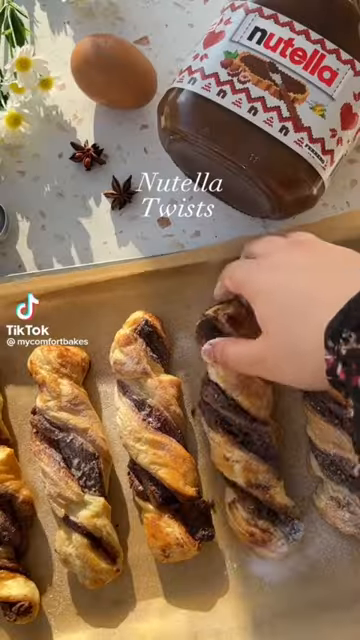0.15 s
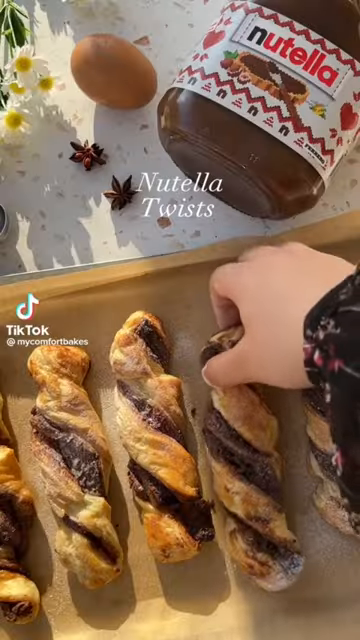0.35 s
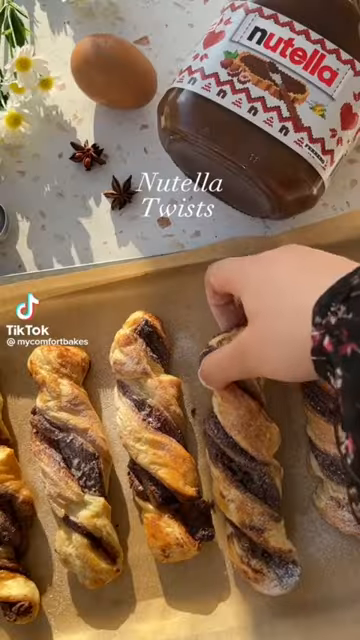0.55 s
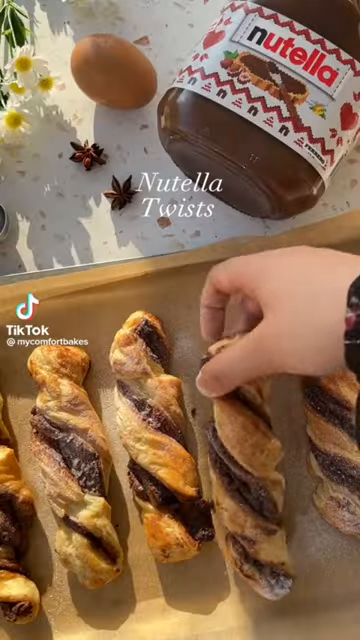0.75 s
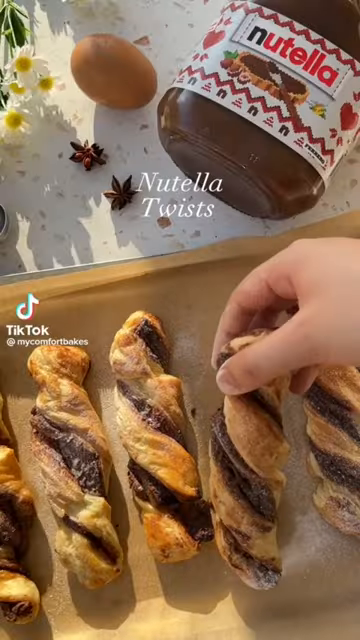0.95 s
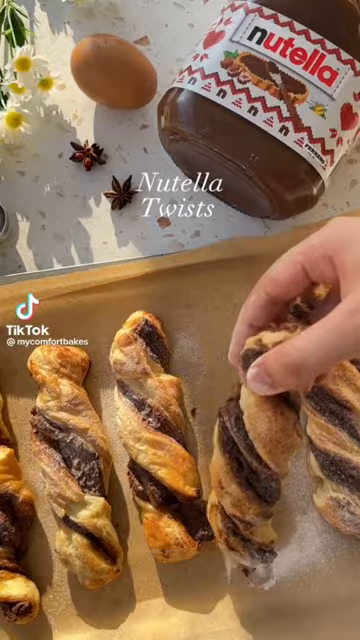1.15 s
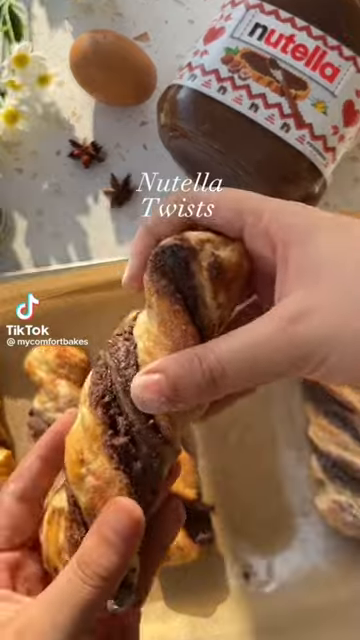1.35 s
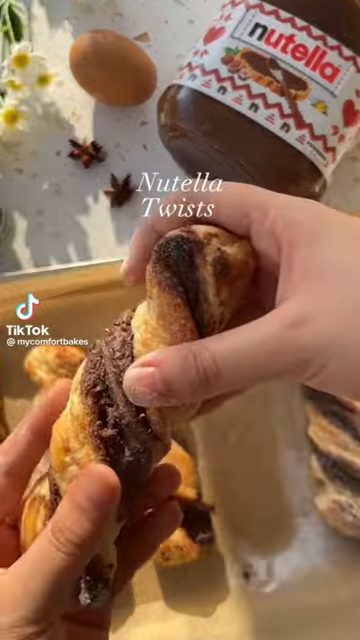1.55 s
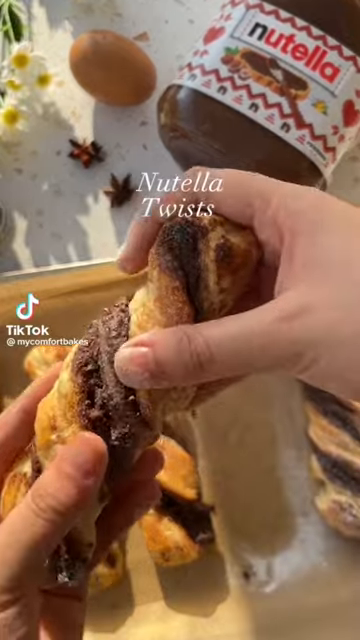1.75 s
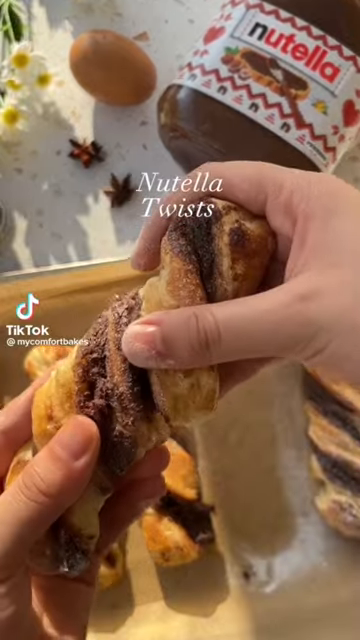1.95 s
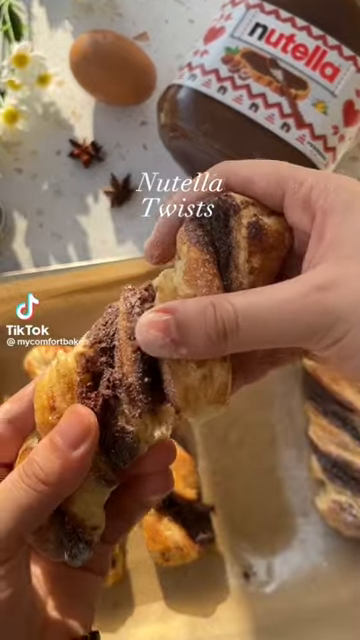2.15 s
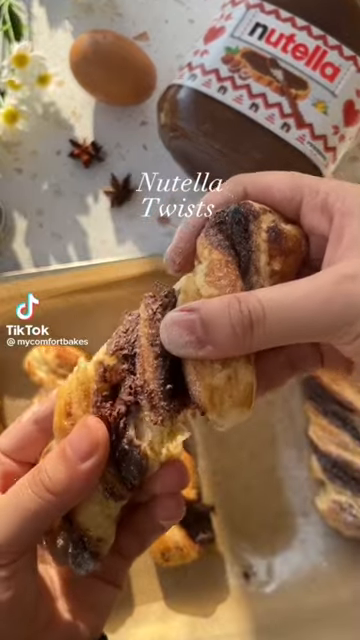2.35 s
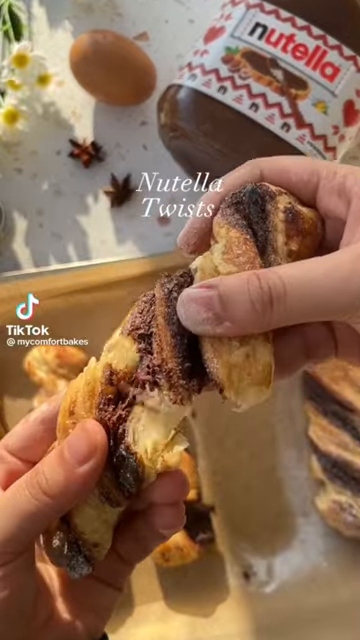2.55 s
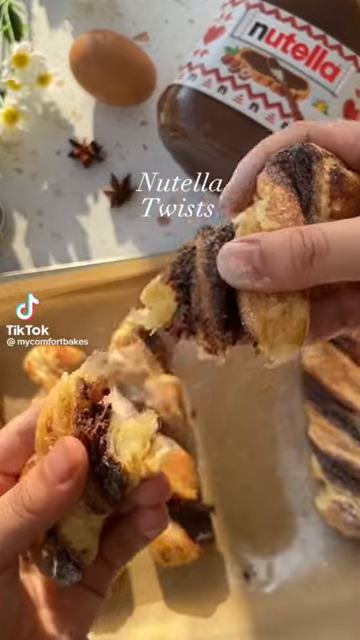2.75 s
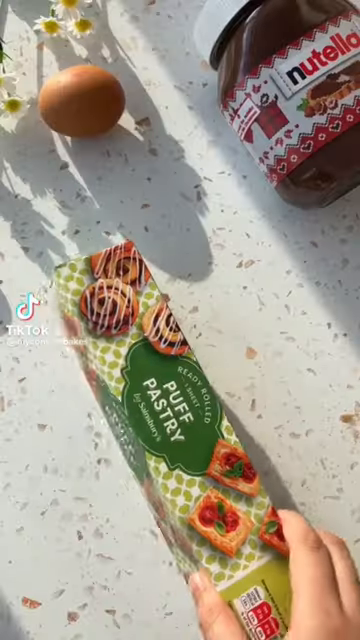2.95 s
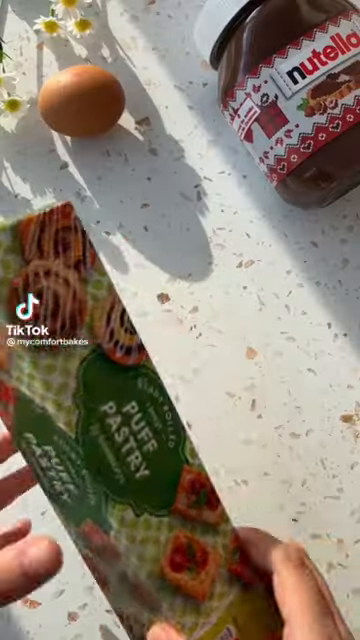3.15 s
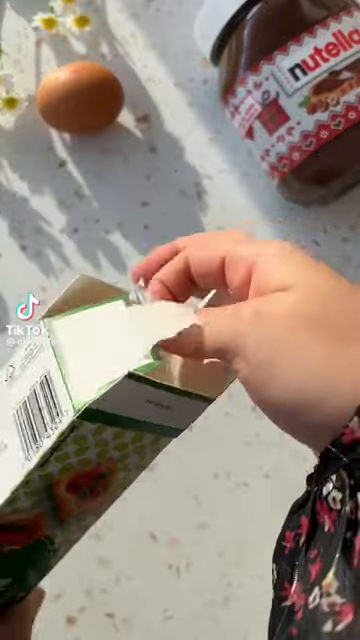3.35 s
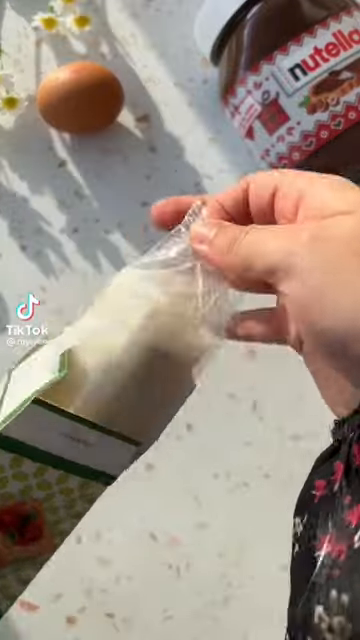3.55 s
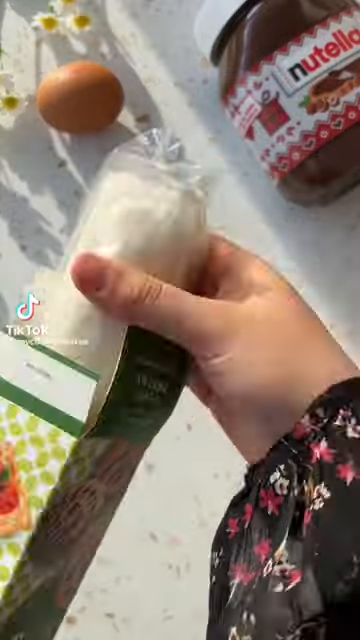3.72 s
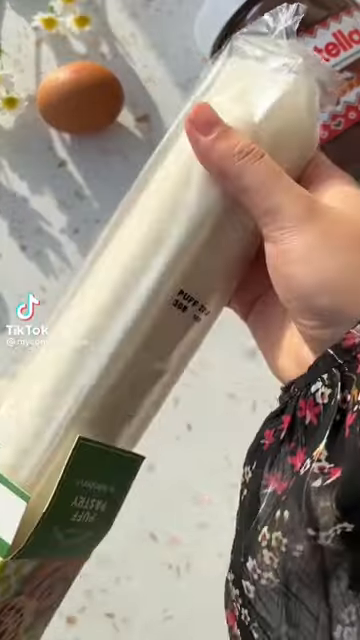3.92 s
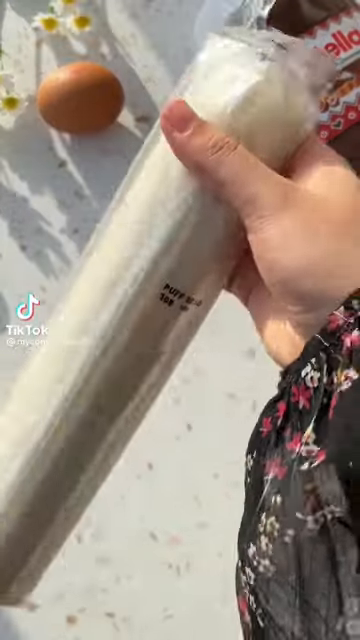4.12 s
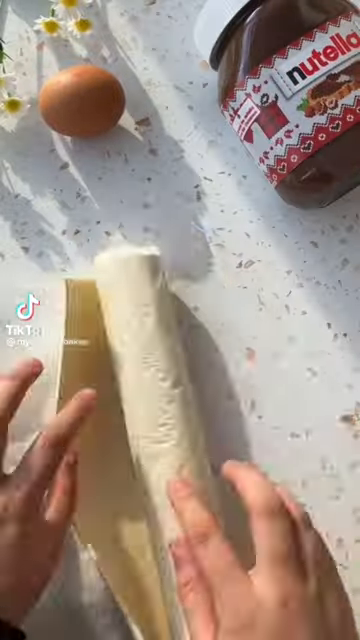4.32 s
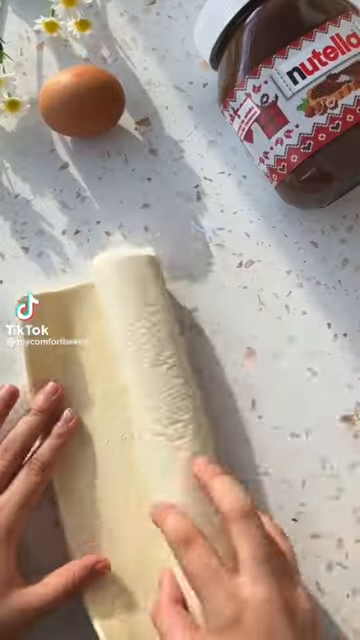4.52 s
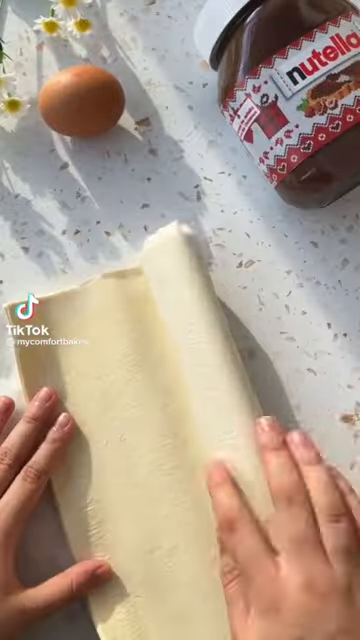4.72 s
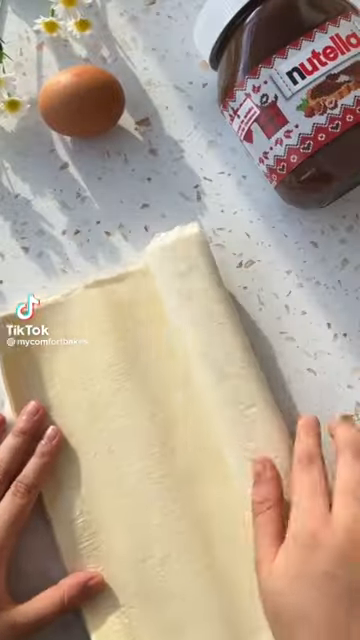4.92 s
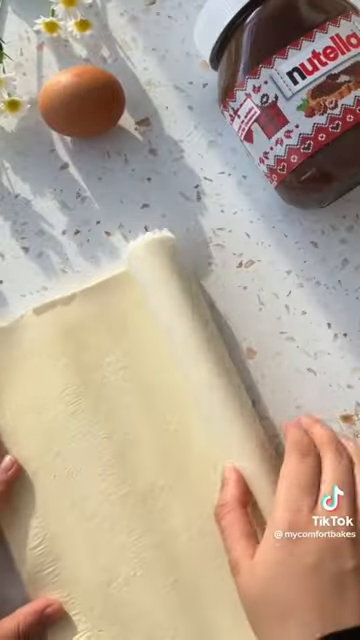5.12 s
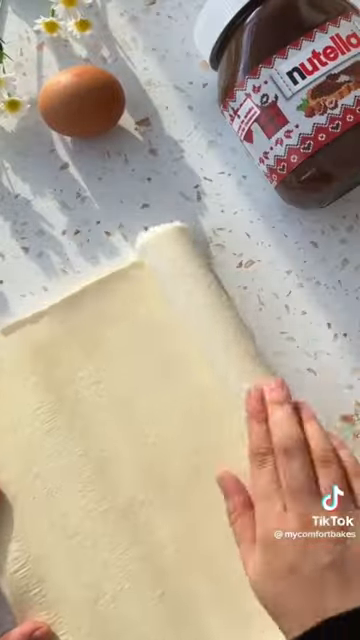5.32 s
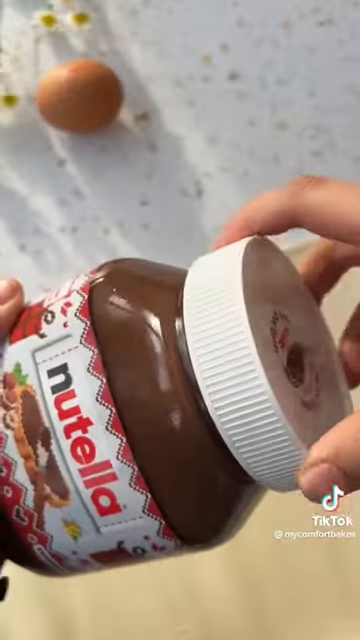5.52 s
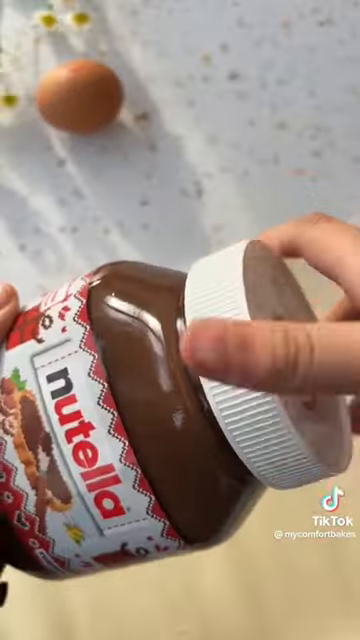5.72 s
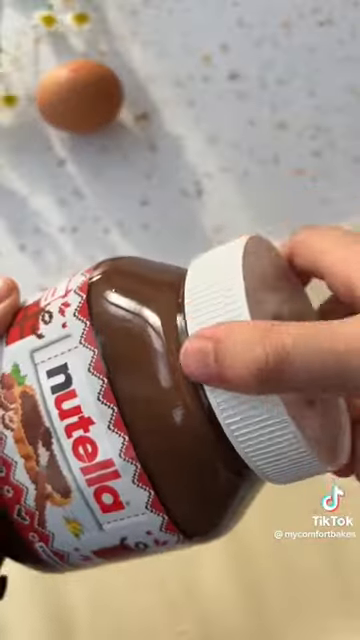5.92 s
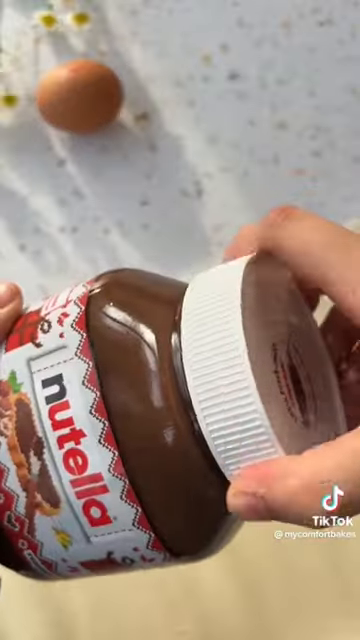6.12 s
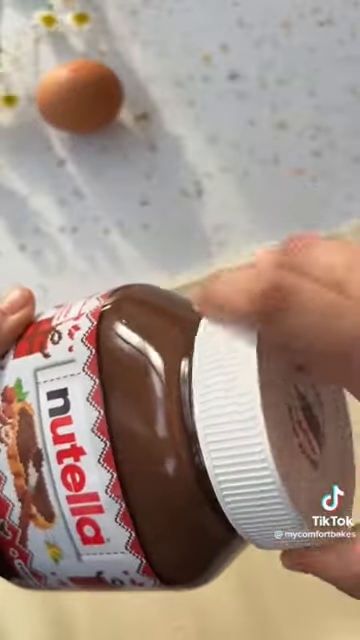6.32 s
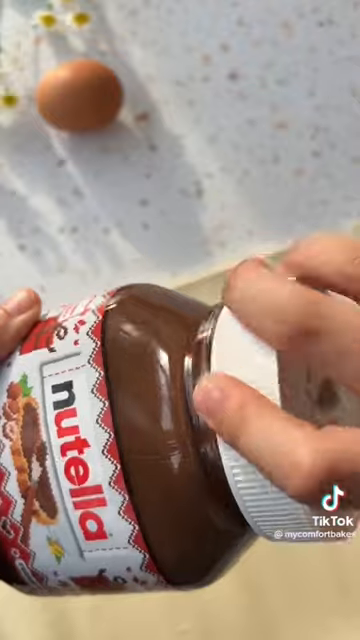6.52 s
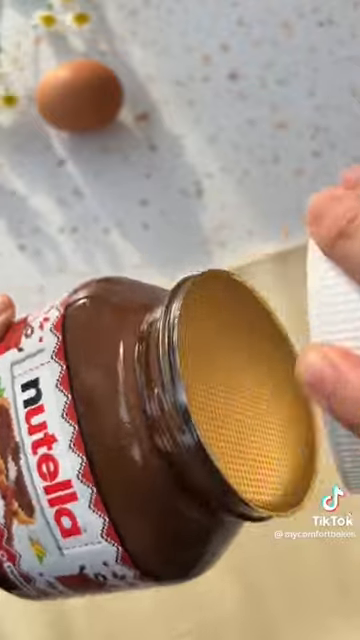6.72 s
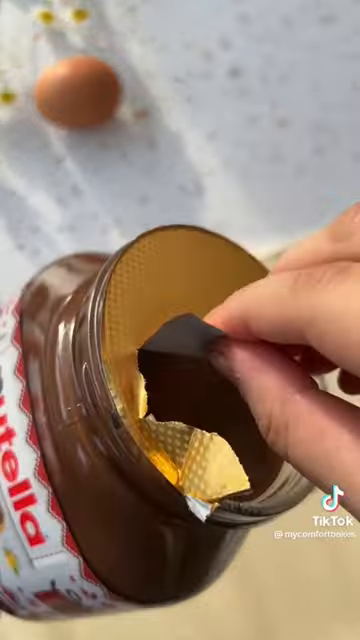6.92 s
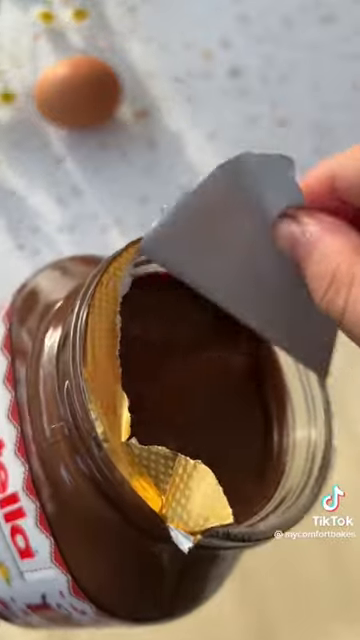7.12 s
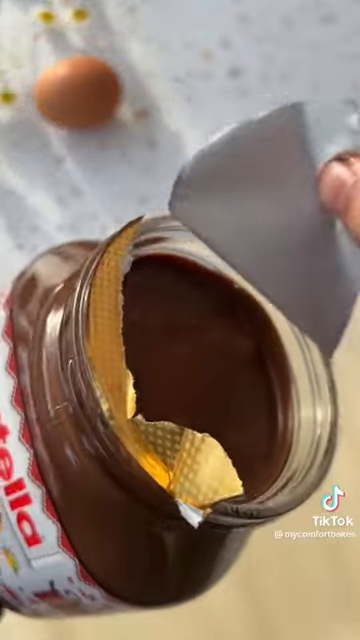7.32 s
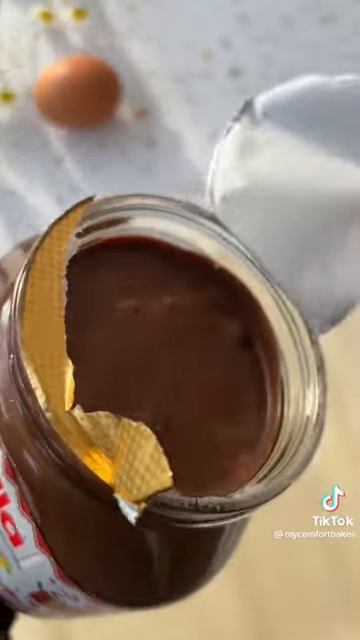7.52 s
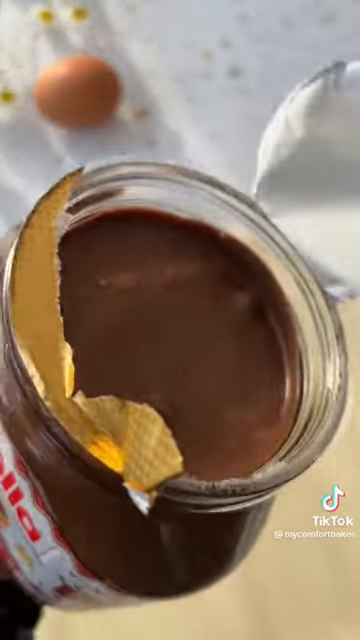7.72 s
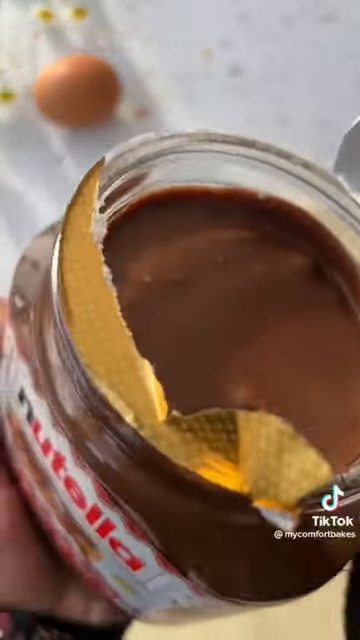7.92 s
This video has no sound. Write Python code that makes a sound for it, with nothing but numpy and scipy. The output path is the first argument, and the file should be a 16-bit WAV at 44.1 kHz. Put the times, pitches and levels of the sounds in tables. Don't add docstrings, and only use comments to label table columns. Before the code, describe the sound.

Intimate stereo phone pickup with little room echo and a quiet low hum. First come crisp flake cracks and a dry tear, then card rubbing, a dull box knock and sharp wrapper crackles, followed by soft rustling as a sheet unrolls. Lid threads tick faster and pop free with a hollow knock. Loudest of all, glued foil tears in a metallic rip, clicking and fluttering before faint touches on glass.

```python
import sys
import numpy as np
from scipy import signal
from scipy.fft import rfft, irfft, next_fast_len
from scipy.io import wavfile
from scipy.ndimage import uniform_filter1d

SR = 44100
rng = np.random.default_rng(int(sys.argv[2]) if len(sys.argv) > 2 else 0)


def natural_amplitude(level_db):
    exponent = np.asarray(level_db, float) / 20
    return 10 ** exponent


def output_pcm(signal):
    pcm = np.clip(np.atleast_2d(signal).T, -1, 1) * 32767
    wavfile.write(sys.argv[1], SR, np.round(pcm).astype(np.int16))


N = 355887


def evened(x):
    return x / np.sqrt(np.mean(x ** 2) + 1e-20)


def read(points, hz):
    f, value = np.transpose(points)
    return np.interp(np.log(hz + 1), np.log(f + 1), value)


def columns(rows):
    s, *cols = np.transpose(rows)
    t = np.arange(s[0], s[-1], 1 / SR)
    return s[0], [np.interp(t, s, c) for c in cols]


def add(mix, s, sound):
    part = mix[round(s * SR):][:len(sound)]
    part += sound[:len(part)]


def resonate(x, hz, width):
    turn = np.exp(2j * np.pi * np.cumsum(hz * np.ones(len(x))) / SR)
    r = np.exp(-np.pi * width / SR)
    return 2 * (turn * signal.lfilter([1 - r], [1, -r], x / turn)).real


def strokes(rows, start, end):
    stroke_db = 20
    t = np.arange(start, end, 1 / SR)
    peaks = [start] + [row[0] for row in rows] + [end]
    gains = []
    for (s, db, rise, fall), before, after in zip(rows, peaks, peaks[2:]):
        slope = np.maximum((s - t) / rise, (t - s) / fall)
        gains.append(natural_amplitude(db - stroke_db * slope) * (t > before) * (t < after))
    return gains


HELD = {"pastry": (.11, 2.9, -14, -81, -80), "box": (2.9, 4.33, 0, -76, -78),
        "sheet": (4.33, 5.93, -11, -81, -88), "lid": (5.42, 6.9, -8, -85, -95),
        "foil": (6.915, 7.74, -10, -72, -60), "jar": (7.74, 8.07, -8, -75, -77)}


def effort(rows, held):
    start, end, heft_db, idle_body_db, idle_crisp_db = HELD[held]
    power = np.array(strokes([row[:4] for row in rows], start, end)) ** 2
    heft = natural_amplitude(np.array([heft_db + sum(row[4:]) for row in rows])) ** 2
    body = np.sqrt(heft @ power + natural_amplitude(idle_body_db) ** 2)
    crisp = np.sqrt(power.sum(0) + natural_amplitude(idle_crisp_db) ** 2)
    return start, body, crisp


def flicker(n, per_s, spread_db, ring_s):
    happens = rng.random(n) < per_s / SR
    power = natural_amplitude(spread_db * np.minimum(rng.exponential(1, n), 4)) ** 2 * happens
    power = signal.lfilter([1], [1, -np.exp(-1 / (ring_s * SR))], power)
    power = signal.lfilter([1], [1, -np.exp(-1.6 / (ring_s * SR))], power[::-1])[::-1]
    return power / (uniform_filter1d(power, 3000) + 1e-9)


TONE_HZ = [300, 700, 1100, 2300, 4300, 5000, 6000, 10500, 13000, 15300]


def crinkle(rows, held, tone, per_s, spread_db, smooth, ring_s=0.0014, patch_s=0.0024):
    s, body, crisp = effort(rows, held)
    n = len(body)
    size = next_fast_len(n)
    hz = np.fft.rfftfreq(size, 1 / SR)
    colour = natural_amplitude(read([(150, -48.5)] + list(zip(TONE_HZ, tone)) + [(16000, -38)], hz))
    noise = rfft(rng.standard_normal(n), size) * colour
    wide = flicker(n, per_s, spread_db, ring_s)
    centres = np.geomspace(500, 13000, num=11)
    dull, bright = np.zeros((2, n))
    for k, f in enumerate(centres):
        patch = np.sqrt(np.interp(np.log(hz + 1), np.log(centres), np.arange(len(centres)) == k))
        bursts = 1.02 * wide + .4 * flicker(n, per_s / 3, spread_db, patch_s)
        power = smooth + (1 - smooth) * bursts
        layer = bright if f > 1700 else dull
        layer += irfft(noise * patch, size)[:n] * np.sqrt(power)
    return s, body * evened(dull) + crisp * evened(bright)


# peak in seconds, effort in dB, rise in seconds, fall in seconds,
# and extra heft in dB where the grip is unusual.
PASTRY = [(.137, -53.5, .015, .4, -10), (.303, -38.5, .18, .13), (.483, -46.5, .02, .2, -8),
          (.676, -55.5, .08, .2, 7), (.825, -42.5, .03, .12), (.918, -45.5, .15, .1),
          (1.01, -50, .07, .1, 8), (1.1, -55, .025, .08, 9), (1.3, -64.5, .03, .5, 13),
          (1.612, -60.5, .03, .15), (1.672, -47.5, .035, .6), (1.878, -42, .1, .2), (1.938, -37, .2, .12),
          (2.05, -54, .1, .2), (2.39, -66, .3, .3), (2.56, -56, .15, .11, -10)]
PASTRY_TONE = [-3, -10, -4, -4, -3, -2, -4, -3, -9, -5]


def pastry():
    return crinkle(PASTRY, "pastry", PASTRY_TONE, 500, 2.8, 0.24)


# peak in seconds, effort in dB, rise in seconds, fall in seconds, extra heft in dB.
BOX = [(2.935, -55, .05, .14, 0), (3.3, -63, .01, .2, 4), (3.43, -50, .05, .7, -2),
       (3.757, -39, .027, .008, -16), (3.865, -51.5, .06, .9, 0), (4.19, -44, .03, .07, -9),
       (4.285, -46.5, .04, .05, -15)]
BOX_TONE = [-8.5, -7.5, -6, -4, -9.5, -9.5, -10.5, -10.5, -17.5, -19]


def box():
    return crinkle(BOX, "box", BOX_TONE, 570, 4.6, 0.7)


# peak in seconds, effort in dB, rise in seconds, fall in seconds,
# and sometimes extra heft in dB.
SHEET = [(4.345, -55, .02, .22),(4.532, -55, .2, .4), (4.635, -52, .3, .19), (4.8, -61, .08, .8),
         (4.915, -56, .04, .6), (5.06, -48, .3, .2, 5), (5.28, -54, .3, .2), (5.395, -51, .15, .05),
         (5.613, -64.5, .3, .05)]
SHEET_TONE = [2, -3, 0., -2, -2, -.5, -3, -1, -6, -15]


def sheet():
    return crinkle(SHEET, "sheet", SHEET_TONE, 400, 2.8, 0.3)


# peak in seconds, effort in dB, rise in seconds, fall in seconds, extra heft in dB.
LID = [(5.45, -62, .03, .14, 10), (5.985, -49, .04, .35, 0), (6.128, -45, .15, .6, -2),
       (6.345, -39, .6, .04, -6), (6.388, -39, .04, .3, -6), (6.441, -35, .2, .08, -3),
       (6.522, -30, .022, .15, 0), (6.557, -23.5, .07, .1, -1), (6.585, -24.5, .05, .045, -2),
       (6.655, -41, .2, .125, 0)]
LID_TONE = [-6, 1, 0., -13, -10, -6.5, -10.5, -8.5, -31, -14]


def lid():
    return crinkle(LID, "lid", LID_TONE, 300, 2.2, 0.17, ring_s=.003)


# peak in seconds, effort in dB, rise in seconds, fall in seconds, extra heft in dB.
FOIL = [(6.948, -28.5, .009, .6, -3), (7.04, -24, .4, .25, -3), (7.16, -34, .5, .05, -2),
        (7.2, -38.5, .1, .065, -6), (7.44, -33.5, .3, .07, 4), (7.519, -38.5, .1, .15, 3),
        (7.663, -42.5, .5, .06, 0)]
FOIL_TONE = [0., 2, 4, -4.5, -6, -5, -8, -3, -19, .5]


def foil():
    return crinkle(FOIL, "foil", FOIL_TONE, 300, 3.5, 0.75, ring_s=0.0023, patch_s=0.0036)


# peak in seconds, effort in dB, rise in seconds, fall in seconds.
JAR = [(7.785, -50, .04, .1), (7.826, -48, .05, .1), (8.012, -46, .022, .07)]
JAR_TONE = [10.5, 0., -3.5, -4, -6.5, -5, -7, 2.5, -15, -27]


def jar():
    return crinkle(JAR, "jar", JAR_TONE, 400, 5.7, 0.13)


def snaps(rows, wide_db, octaves, t60, spike_db, trim_db):
    rise_s = .008
    out = np.zeros(N)
    t = (np.arange(2048) - 256) / SR
    hz = np.fft.rfftfreq(2048, 1 / SR)
    noise = rfft(rng.standard_normal((len(rows), 2048)))
    wide = natural_amplitude(read([(200, -14), (1500, -3), (10500, -1.5), (12000, -6), (15300, -11.5), (16000, -56.5)], hz))
    for (s, db, f), z in zip(rows, noise):
        colour = np.exp(-(np.log2((hz + 1) / f) / octaves) ** 2) + natural_amplitude(wide_db) * wide
        fade = natural_amplitude(-60 * np.maximum(t / (t60 * (3000 / f) ** .3), -t / rise_s))
        spike = np.roll(irfft(colour), 256)
        snap = evened(irfft(z * colour)) * fade + natural_amplitude(spike_db) * spike / spike.max()
        peak = np.sqrt(uniform_filter1d(snap ** 2, size=40).max())
        add(out, s + t[0], natural_amplitude(db + trim_db) * snap / peak)
    return out


# time in seconds, peak in dB, centre in Hz.
FLAKES = [(0.2182, -27, 3100), (0.3038, -26, 3270), (0.3736, -40, 3270), (0.3852, -43, 7320),
          (0.4241, -39, 6290), (0.5247, -39, 6800), (0.6425, -38, 1980), (0.6733, -38, 1550),
          (0.6791, -32, 6290), (0.701, -42, 2070), (0.7633, -43, 6200), (0.7766, -30, 5860),
          (0.8001, -30, 6030), (0.8739, -37, 9040), (0.9188, -29, 2070), (0.9969, -37, 3100),
          (1.0975, -36, 2930), (1.2684, -63, 1120), (1.604, -56, 10590), (1.612, -47, 6200),
          (1.6237, -49, 10590), (1.6651, -39, 1640), (1.6709, -33, 6120), (1.6993, -35, 5770),
          (1.7163, -39, 1380), (1.7279, -37, 7320), (1.7362, -40, 5770), (1.7743, -38, 7580),
          (1.8044, -40, 8960), (1.8458, -24, 8010), (1.8764, -26, 6890), (1.8841, -30, 7490),
          (1.8923, -31, 10850), (1.9383, -28, 6630), (1.9642, -32, 6120), (1.99, -34, 4050),
          (2.0053, -37, 2330), (2.0496, -42, 4480), (2.0546, -41, 10340), (2.0936, -47, 3530),
          (2.1113, -38, 2930), (2.1341, -50, 10250), (2.1445, -51, 2410), (2.1681, -53, 4050),
          (2.2754, -54, 2930), (2.295, -45, 9910), (2.3202, -56, 5860), (2.3899, -47, 4310),
          (2.4751, -51, 9220), (2.8231, -50, 4130)]
# time in seconds, peak in dB, centre in Hz.
CREASES = [(2.9051, -58, 1120), (2.9309, -44, 2580), (2.9977, -51, 1810), (3.2208, -56, 1290),
           (3.2317, -49, 1290), (3.2481, -60, 1640), (3.2647, -57, 1120), (3.2905, -57, 1380),
           (3.2983, -37, 1290), (3.3578, -36, 1120), (3.3628, -42, 1120), (3.398, -40, 3360),
           (3.4353, -39, 2070), (3.4966, -42, 1460), (3.5866, -38, 1120), (3.6816, -24, 2760),
           (3.6937, -37, 5680), (3.7268, -46, 3530), (3.74, -23, 2760), (3.7556, -25, 3100),
           (3.7613, -26, 2150), (3.7822, -52, 2070), (3.8174, -48, 2240), (3.8349, -47, 1290),
           (3.8908, -39, 1460), (3.9138, -41, 2150), (3.9189, -41, 1720), (3.9416, -42, 1120),
           (3.9553, -43, 1640), (4.057, -34, 7920), (4.0719, -41, 3530), (4.1188, -22, 6370),
           (4.1244, -34, 2670), (4.1645, -44, 1980), (4.1826, -31, 1460), (4.1895, -32, 1980),
           (4.2105, -36, 1290), (4.2178, -29, 6800), (4.2751, -32, 6720), (4.2824, -30, 5600),
           (4.2948, -40, 6800), (4.3199, -47, 2670), (4.4692, -45, 1810), (4.601, -35, 3450),
           (4.6789, -42, 4310), (4.8312, -42, 3530), (4.9112, -45, 2240), (5.1699, -39, 5170),
           (5.1847, -38, 6890), (5.5105, -48, 1210), (5.588, -44, 1290), (5.6079, -49, 1640),
           (5.6146, -45, 1810), (5.6278, -53, 1720), (5.8765, -53, 7060), (5.9254, -51, 1720)]


def flakes_and_creases():
    return snaps(FLAKES + CREASES, -4.0, 0.4, 0.018, 12.0, -3.0)


# time in seconds, peak in dB, centre in Hz.
THREAD = [(5.9714, -35, 1810), (5.9782, -27, 1720), (5.9983, -32, 2760), (6.0031, -28, 1640),
          (6.0164, -33, 2760), (6.036, -30, 8700), (6.0436, -32, 1810), (6.0755, -28, 7580),
          (6.0804, -35, 7240), (6.1014, -29, 7670), (6.1194, -30, 8180), (6.1249, -23, 7580),
          (6.1321, -24, 5940), (6.1419, -28, 1720), (6.1778, -27, 1720), (6.2124, -27, 6460),
          (6.2362, -18, 6290), (6.2418, -27, 7240), (6.2501, -25, 7410), (6.2726, -27, 6290),
          (6.2832, -18, 5770), (6.2952, -25, 5680), (6.2999, -27, 5600), (6.3337, -22, 6120),
          (6.34, -20, 5940), (6.3504, -29, 1640), (6.4325, -22, 1720), (6.4467, -20, 6980),
          (6.4656, -24, 7150), (6.4808, -29, 7750), (6.4898, -17, 6980), (6.4987, -27, 6720),
          (6.5177, -15, 7490), (6.5286, -11, 7320), (6.5499, -9, 5770), (6.5598, -5, 6980),
          (6.5837, -7, 1380), (6.6481, -19, 8270), (6.6556, -16, 8440)]


def thread_slips():
    return snaps(THREAD, -4.0, 0.35, 0.012, 13.0, -7.0)


# time in seconds, peak in dB, centre in Hz.
TICKS = [(6.9468, -18, 3700), (6.9653, -13, 3700), (7.0105, -13, 1980), (7.0367, -11, 2410),
         (7.0443, -7, 1890), (7.053, -13, 1890), (7.0628, -14, 1810), (7.0893, -14, 1640),
         (7.1004, -14, 5600), (7.2072, -26, 1120), (7.3155, -29, 6980), (7.3874, -22, 1210),
         (7.4198, -21, 3790), (7.4426, -20, 1120), (7.4485, -21, 1290), (7.5141, -22, 1550),
         (7.5233, -20, 1720), (7.5371, -24, 1460), (7.5518, -29, 7840), (7.5666, -31, 8180),
         (7.5808, -30, 2500), (7.5864, -27, 2670), (7.6009, -29, 1120), (7.6152, -22, 9300),
         (7.6337, -27, 3100), (7.646, -30, 7580), (7.6575, -23, 1550), (7.6643, -21, 7670),
         (7.6774, -26, 7670), (7.6893, -36, 9990), (7.6999, -35, 10080), (7.7108, -33, 9910),
         (7.724, -34, 10160), (7.7928, -37, 9220), (7.8242, -30, 9040), (7.8911, -44, 7920),
         (7.9147, -44, 7060), (8.0086, -35, 8610), (8.047, -43, 5860)]


def foil_ticks():
    return snaps(TICKS, -2.0, 0.3, 0.012, 12.0, -9.0)


def ringing(x, start, end, modes, wander, swell_db):
    part = x[round(start * SR):round(end * SR)]
    steps = rng.standard_normal((2, len(modes), len(part) // 256 + 1))
    drift = np.repeat(uniform_filter1d(steps, size=4), 256, 2)
    drift = evened(uniform_filter1d(drift, 256))[..., :len(part)]
    total = np.zeros(len(part))
    for (hz, width, db), pitch, swell in zip(modes, *drift):
        total += natural_amplitude(db + swell_db * swell) * resonate(part, hz * (1 + wander * pitch), width)
    return start, total


# pitch in Hz, width in Hz, level in dB.
LID_MODES = [(615, 60, 14.5), (800, 150, 3), (1000, 120, 1), (1880, 110, 9), (2830, 120, 5), (3200, 150, 4),
             (4240, 200, 3), (4870, 80, 5), (5820, 250, 1), (7400, 500, -1)]


def lid_ring(x):
    return ringing(x, 5.42, 6.9, LID_MODES, .012, 1.2)


# pitch in Hz, width in Hz, level in dB.
FOIL_MODES = [(900, 90, 4), (1200, 80, 4), (1500, 80, 5), (2260, 120, 7), (2700, 120, 3), (5600, 160, 3),
              (7500, 200, 3)]


def foil_ring(x):
    return ringing(x, 6.915, 7.74, FOIL_MODES, .05, 4.2)


# pitch in Hz, width in Hz, level in dB.
RIM = [(3650, 160, 5)]


def rim_ring(x):
    return ringing(x, 6.915, 7.74, RIM, .02, 5.0)


# time in seconds, pitch in Hz, level in dB.
PULLS = [
    [(6.94, 1150, 1), (7.0, 1600, 0), (7.045, 2050, 2), (7.16, 2500, -1)],
    [(7.26, 1500, 2), (7.33, 2000, 5), (7.39, 2800, 6), (7.43, 3600, 5), (7.47, 3000, -6)],
]


def foil_pulls(x):
    out = np.zeros(N)
    width = 500
    for rows in PULLS:
        s, (hz, db) = columns(rows)
        part = x[round(s * SR):][:len(hz)]
        add(out, s, natural_amplitude(db) * resonate(resonate(part, hz, width), hz, width))
    return out


# peak in seconds, level in dB, pitch in Hz.
MOUTH = [(6.975, -35, 345), (7.0, -37, 360), (7.098, -25, 670), (7.135, -26, 530), (7.2, -26, 506),
         (7.343, -32, 640), (7.443, -33, 625), (7.513, -34, 463), (7.62, -35, 530)]
# time in seconds, pitch in Hz, level in dB.
FLAP = [(7.32, 284.5, -51.5), (7.448, 157, -52.5), (7.56, 181.7, -75)]


def jar_air():
    gulp_rise_s, gulp_fall_s = .04, .06
    out = np.zeros(N)
    s, end = HELD["foil"][:2]
    level = sum(strokes([(at, db, gulp_rise_s, gulp_fall_s) for at, db, _ in MOUTH], s, end))
    hz = np.interp(s + np.arange(len(level)) / SR, *np.transpose(MOUTH)[::2])
    drive = rng.standard_normal(len(hz)) * np.sqrt(0.19 + flicker(len(hz), 120, 3.0, 0.0073))
    air = resonate(resonate(drive, hz, 87), hz, 240)
    add(out, s, level * air / np.sqrt(uniform_filter1d(air ** 2, size=1200)))
    s, (hz, db) = columns(FLAP)
    hum = np.sin(2 * np.pi * np.cumsum(hz) / SR)
    add(out, s, natural_amplitude(db + 7.5) * hum * signal.windows.tukey(len(db), .2))
    return out


# time in seconds, peak in dB, pitch in
# Hz, time to fade by 60 dB in seconds, length in seconds.
KNOCKS = [(0.852, -37.5, 420, 0.024, .05), (1.011, -39, 240, .12, .04), (1.058, -42, 190, .15, .04),
          (3.3575, -27, 887, 0.03, .008), (3.3618, -30.5, 135, 0.87, 0.015),
          (3.3766, -30.5, 170, 0.87, 0.0095), (4.109, -32.5, 744, 0.022, .02), (4.119, -36, 450, .03, .02),
          (4.28, -35, 300, 0.05, 0.02), (.875, -42, 500, .04, .03), (6.556, -23.5, 180, 0.067, 0.19),
          (6.56, -22, 383, 0.046, .1), (6.581, -26, 370, .08, .1), (6.568, -15, 1740, .05, .03),
          (6.582, -17, 1500, .04, .03), (7.14, -21, 920, .1, .03), (3.364, -38, 430, .1, .02),
          (7.004, -16, 2300, .04, .02), (7.103, -13, 5430, .03, .012), (7.66, -33, 153.5, 0.061, .1),
          (7.825, -38.5, 523, 0.056, .05)]


def knocks():
    out = np.zeros(N)
    for s, db, hz, t60, length in KNOCKS:
        t = np.arange(0, length, 1 / SR)
        stop = np.minimum((length - t) / .001, 1)
        add(out, s, natural_amplitude(db - 60 * t / t60) * np.sin(2 * np.pi * hz * t) * stop)
    return out


# pitch in Hz, time to fade by 60 dB in seconds.
KITCHEN = [(200, 0.79), (2000, 0.3), (10000, 0.39)]


def kitchen(x):
    taps = np.zeros(SR // 2)
    at = np.arange(200, SR // 2 - 20, 20)
    taps[at + rng.integers(0, 20, len(at))] = rng.choice([-1., 1.], len(at))
    hz, t, z = signal.stft(taps, SR, nperseg=256)
    tail = signal.istft(z * natural_amplitude(-60 * t / read(KITCHEN, hz)[:, None]), SR, nperseg=256)[1]
    return signal.oaconvolve(x, tail / np.linalg.norm(tail))[:N]


# start in seconds, deep air in dB, house hum in dB.
RUMBLE = [(0.11, -56, -59), (1.45, -50, -58.5), (2.9, -56, -57), (3.385, -70, -63), (5.42, -56, -60),
          (6.9, -54, -56), (7.74, -73, -62)]
# pitch in Hz, level in dB per Hz.
RUMBLE_TONE = [(65, -15), (110, -5), (174, -2), (404, -23.5), (796, -38), (1090, -47.5), (1500, -54),
               (1950, -62), (3300, -120)]


def rumble():
    starts, *levels = np.transpose(RUMBLE)
    s, out = starts[0], np.zeros(N)
    n = N - round(s * SR)
    shot = np.searchsorted(starts, s + np.arange(n) / SR, "right") - 1
    deep_db, hum_db = (uniform_filter1d(db[shot], size=400) for db in levels)
    hz = np.fft.rfftfreq(n, 1 / SR)
    z = rfft(rng.standard_normal((2, n)))
    deep_tone = [(15, -26), (32, -10), (45, 1.5), (70, 0.5), (95, -4.5), (130, -8.5), (300, -72)]
    hum_tone = RUMBLE_TONE + [(5000, -55.5), (15300, -55.5), (16000, -91)]
    deep = irfft(z[0] * natural_amplitude(read(deep_tone, hz)), n)
    hum = irfft(z[1] * natural_amplitude(read(hum_tone, hz)), n)
    add(out, s, natural_amplitude(deep_db) * evened(deep) + natural_amplitude(hum_db) * evened(hum))
    return out


# start and end in seconds, level in dB.
CUTS = [(0, .112, -90), (3.3855, 3.393, -16), (3.408, 3.417, -14), (3.763, 3.80, -8), (4.324, 4.334, -12),
        (6.896, 6.918, -45), (7.738, 7.752, -22), (7.761, 7.776, -25), (8.061, 8.08, -15)]


def scene_changes():
    gate = np.ones(N)
    for start, end, db in CUTS:
        gate[round(start * SR):round(end * SR)] = natural_amplitude(db)
    return uniform_filter1d(gate, size=24)


def scene():
    near = flakes_and_creases() + thread_slips() + foil_ticks()
    for material in (pastry, box, sheet, lid, foil, jar):
        add(near, *material())
    add(near, *lid_ring(near))
    peel = near.copy()
    add(near, *foil_ring(peel))
    add(near, *rim_ring(peel))
    near = near + foil_pulls(peel) + knocks() + jar_air()
    mix = near + natural_amplitude(-16) * kitchen(near) + rumble()
    return np.tile(mix * scene_changes(), (2, 1))


def band_limit(x):
    return signal.sosfilt(signal.butter(12, 16650, fs=SR, output="sos"), x)


# pitch in Hz, lead in radians.
LEAD = [(300, 0), (650, .6), (1100, .55), (1700, 0), (4000, 0), (4700, -1), (5050, -np.pi),
        (5600, -2 * np.pi), (7500, -2 * np.pi), (10000, -7.7), (11800, -3 * np.pi)]
# pitch in Hz, difference in dB.
TILT = [(50, 0), (200, -2.5), (450, -6), (800, -4), (1600, 0), (2300, 0), (4000, .6), (5600, 0)]
# pitch in Hz, likeness from 0 to 1.
ALIKE = [(60, 1), (250, .96), (600, .8), (1300, .85), (1800, .99), (2300, .99), (2700, .75), (3600, .95),
         (5000, .06), (5700, 1), (7500, 1), (9500, .6), (11000, .6), (11700, .97), (12300, 1)]
# start in seconds, times the usual unlikeness, share of room.
WIDTH = [
    (0, 2.5, 0),
    (3.385, 1.2, 2.1),
    (5.42, 1.35, 0),
    (6.9, 1.1, 0),
]
# pitch in Hz, unlikeness of the room share.
ROOMY = [(200, .2), (600, 1), (5000, 1), (5900, .02), (7400, .02), (7800, .6), (11000, .6), (11800, .06),
         (16000, .03)]


def record(dry):
    hz, t, z = signal.stft(dry, SR, nperseg=256, noverlap=192)
    waver = uniform_filter1d(rng.standard_normal(z.shape[1:]), 5, 0)
    waver = evened(uniform_filter1d(waver, 6, 1))
    total = (abs(z[0, 20:]) ** 2).sum(0)
    jump = total > natural_amplitude(7) ** 2 * uniform_filter1d(total, size=40)
    sudden = uniform_filter1d(1. * jump, size=8) > 0
    starts, times, room = np.transpose(WIDTH)
    shot = np.searchsorted(starts[1:], t)
    room_share = np.outer(read(ROOMY, hz), room[shot])
    unlike = np.outer(-2 * np.log(read(ALIKE, hz)), times[shot]) + room_share
    spread = np.sqrt(abs(unlike)) + 0.65 * sudden
    z = z * natural_amplitude(1.3 * room_share)
    half = np.exp(.5j * (read(LEAD, hz)[:, None] + spread * waver)) * natural_amplitude(read(TILT, hz) / 2)[:, None]
    left, right = z[0] * half, z[1] / half
    pair = np.array([left + right, left - right]) / 2
    power = uniform_filter1d(uniform_filter1d(abs(pair) ** 2, size=3, axis=1), size=18, axis=2)
    keep = (power > power[::-1] * natural_amplitude(-13) ** 2) | (hz[:, None] < 1400) | sudden
    pair = pair * keep * (hz[:, None] < 15900)
    both = np.array([pair[0] + pair[1], pair[0] - pair[1]])
    ports = signal.istft(both, SR, nperseg=256, noverlap=192)[1]
    return band_limit(ports[:, :N])


dry = scene()
out = record(dry)
output_pcm(out)
```